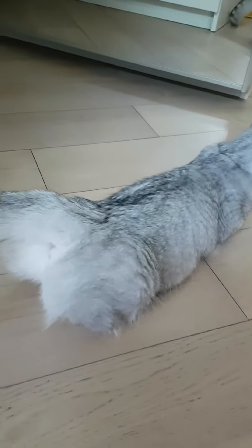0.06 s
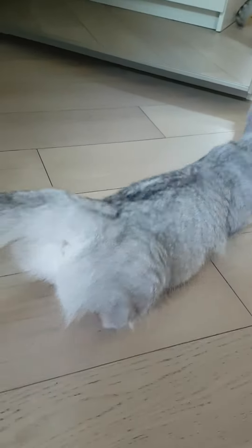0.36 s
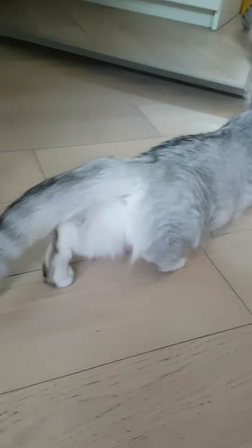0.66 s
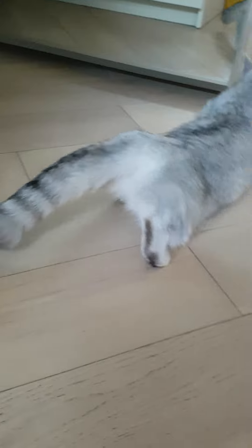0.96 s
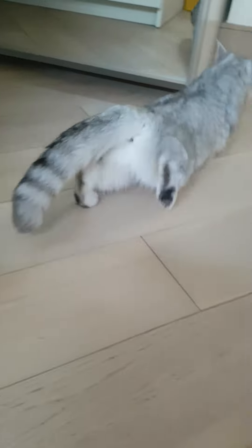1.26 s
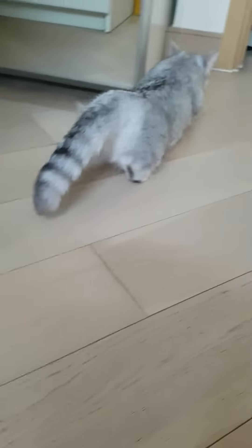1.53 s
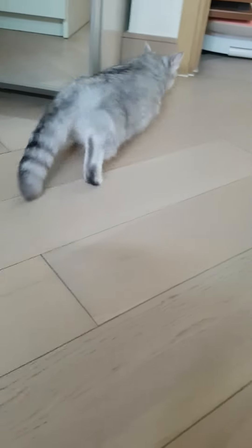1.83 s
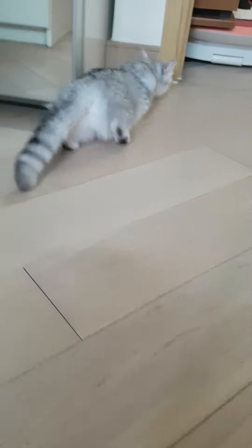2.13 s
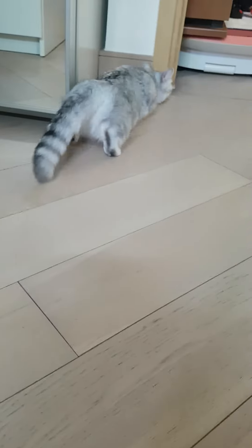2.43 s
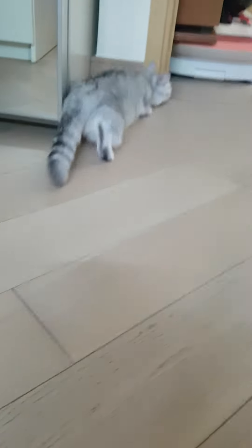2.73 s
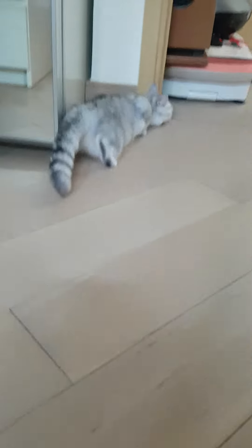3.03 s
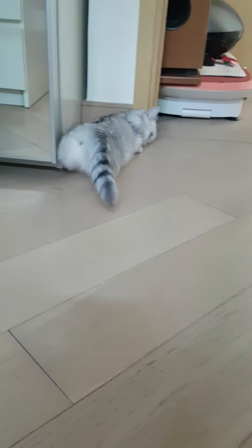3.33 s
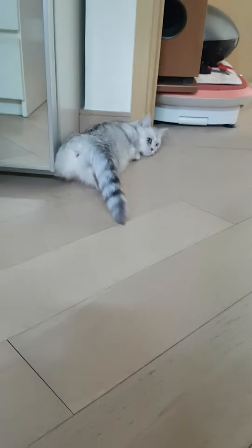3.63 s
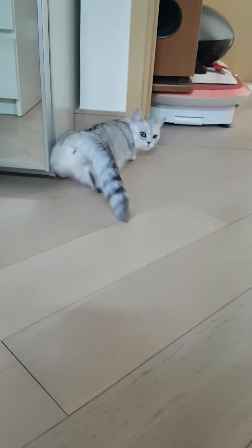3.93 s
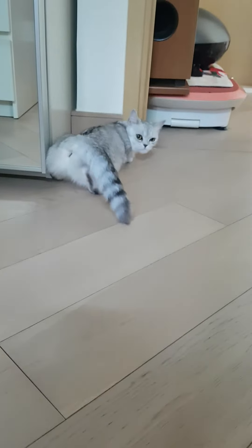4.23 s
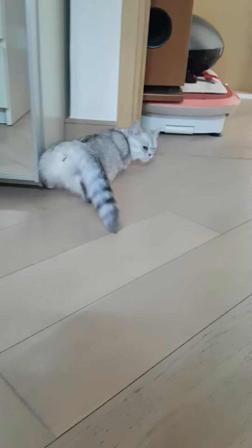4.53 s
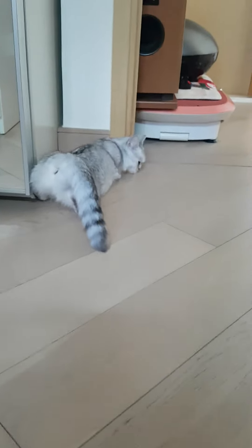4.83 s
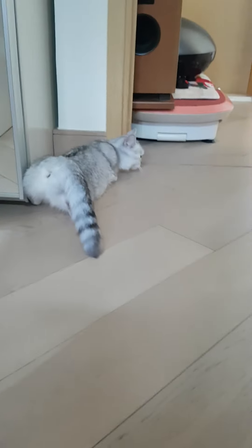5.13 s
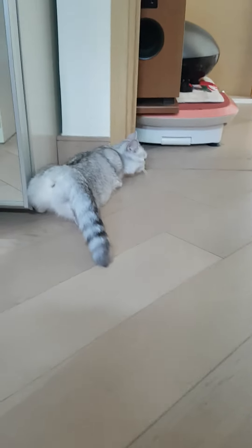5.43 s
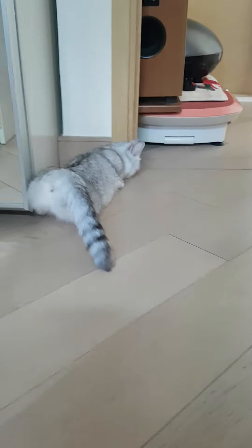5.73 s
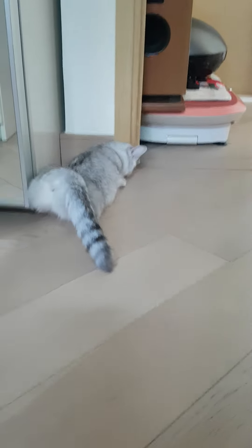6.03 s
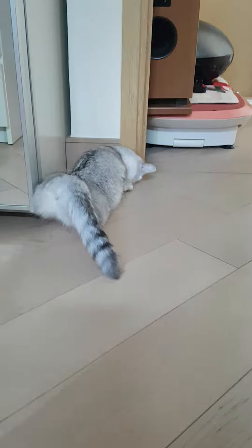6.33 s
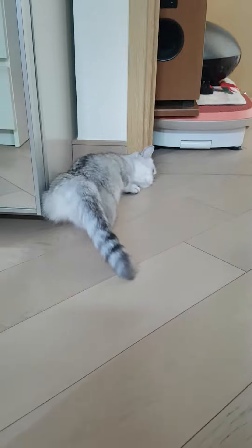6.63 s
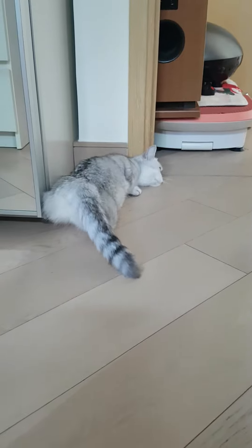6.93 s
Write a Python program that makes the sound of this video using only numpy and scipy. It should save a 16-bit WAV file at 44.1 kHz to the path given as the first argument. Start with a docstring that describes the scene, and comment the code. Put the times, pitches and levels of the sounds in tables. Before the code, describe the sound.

A cat gives four low, growling yowls indoors, with a few sharp clicks and faint scuffs over a ventilation hum.

```python
"""A yowling cat indoors

A cat gives four low yowls that rise and fall, the last two with its mouth opening wide. On the higher
notes its throat closes about 32 times a second, so a growl throbs through the voice. Paws and fur brush
the wooden floor, and fingers click on the phone that listens, sharpest in one double click.
Ventilation hums throughout; a far engine and a second low drone join in for a while."""
import sys
import numpy as np
from scipy import signal
from scipy.fft import rfft, irfft
from scipy.io import wavfile
from scipy.ndimage import uniform_filter1d

SR = 44100
rng = np.random.default_rng(int(sys.argv[2]) if len(sys.argv) > 2 else 0)


def store_pcm(level_fs):
    """Save levels as 16-bit WAV."""
    pcm = np.round(np.clip(level_fs, -1, 1) * 32767).astype(np.int16)
    wavfile.write(sys.argv[1], SR, np.atleast_2d(pcm).T)


N = 311972
T = np.arange(N) / SR  # time of each sample [s]
HZ = np.maximum(np.arange(N // 2 + 1) * SR / N, 1)  # frequencies the filters work on [Hz]

# how alike the phone's two microphones hear noise: (frequency [Hz], correlation [-1 to 1])
MIC_LIKENESS = [(60, 0.98), (130, 1), (290, 0.48), (640, 0.46), (1410, -0.24), (3100, 0.094),
                (6820, -0.063), (15000, -0.017)]
# rumble and hiss of moving air: (frequency [Hz], relative level [dB])
AIR_SPECTRUM = [(20, -22), (40, -12), (100, -6.5), (200, -11.5), (240, -8.5), (420, -12.5), (700, -12.5),
                (1150, -20), (1350, -19.5), (2300, -24), (3300, -33), (8000, -43.5), (10500, -42),
                (15000, -35)]
# resonances of the air duct and the room: (frequency [Hz], rough width [Hz], level [dB])
DUCT_RESONANCES = [(44, 20, -57), (55.6, 5.6, -58.5), (82.5, 7, -61.5), (131.1, 21.8, -56),
                   (163.5, 30.6, -56.5), (182.13, 8.6, -57.5), (540, 89, -68.5), (1136, 87, -72)]

# one list for each yowl, tracing its tune: (time [s], pitch [Hz])
YOWL_PITCHES = [
    [(.02, 334), (.09, 343.3), (.16, 364.6), (.33, 348.8), (.54, 383.1), (.58, 362), (.635, 342)],
    [(.922, 404.5), (.96, 396.6), (1.0, 409), (1.055, 411.6), (1.11, 377.6), (1.16, 371), (1.255, 318)],
    [(3.19, 315), (3.26, 334.5), (3.32, 376), (3.56, 383), (3.64, 405), (3.69, 434.7), (3.76, 443.7),
     (3.84, 396), (3.91, 360.5)],
    [(4.372, 418), (4.44, 434.6), (4.53, 424.5), (4.57, 397.3), (4.66, 397.5), (4.73, 386), (4.81, 356)],
]
# each yowl's voice at EASY_HZ: (relative level [dB], overtones against the lowest tone [dB],
# roughness [0-1], fade-in [s], time of one throat closure [s], vocal-fold cycles per closure [count])
YOWL_VOICES = [(-42.5, -3.5, .15, 0.062, .531, 12), (-40.5, -9, 0.25, 0.04, 1.035, 12.2),
               (-47.5, -0.85, 0.37, .02, 3.704, 13.4), (-47.5, -1.5, 0.23, 0.043, 4.503, 12.9)]
# how the cat's head moves: (time [s], jaw opening [0-1], lowest tone's left minus right [dB])
HEAD_MOVES = [(1.3, .04, 0), (3.3, 0.5, 3), (3.58, 1, 5.5), (3.7, 1, 0.5), (4.48, 0.91, -3.5),
              (4.6, .9, 7.5), (4.8, 0.85, 5)]
# throat and mouth resonances, jaw nearly shut: (frequency [Hz], width [Hz], relative level [dB])
SHUT_RESONANCES = [(727, 335, 16), (990, 115, 2.5), (1500, 210, -1), (2200, 280, -43), (4500, 3500, -46)]
# the same with the jaw wide open: (frequency [Hz], width [Hz], relative level [dB])
OPEN_RESONANCES = [(868.8, 282, 5.5), (1183, 120, -7.5), (1682.6, 270, -1), (2190, 540, -17),
                   (2570, 3300, -19.5), (4500, 3000, -48)]
# hoarse squeals in the first two yowls, and at 0.606 s a brief bright swell near the first yowl's third
# harmonic: (peak time [s], half-length [s], pitch [Hz], relative level [dB])
SQUEAL_EVENTS = [(0.256, .015, 845, -56), (0.565, 0.038, 875.5, -50.5), (0.606, 0.022, 1050, -48),
                 (1.012, 0.068, 931, -51), (1.16, .05, 1090, -50)]

# paws and fur brushing the floor:
# (peak time [s], half-length [s], level [dB], middle of the hiss [Hz], floor against the hiss [dB])
SCUFF_EVENTS = [(0.507, 0.0042, -62.5, 6000, -5), (.528, 0.014, -57, 4960, -1), (0.558, .05, -71, 4000, 9),
                (0.741, .033, -68.5, 2980, 9), (0.784, 0.02, -55.5, 3700, 1), (0.807, 0.014, -55, 2530, -2),
                (.978, 0.0066, -67, 5984, -3), (1.052, 0.15, -75.5, 4930, 13),
                (1.626, 0.061, -74, 4700, 11), (1.804, 0.052, -73, 3000, 14), (1.799, 0.0089, -57, 520, 6),
                (3.008, 0.018, -70, 3460, -2), (5.492, 0.0086, -69.5, 3080, 17.5),
                (6.437, 0.054, -75.5, 4012, 15), (6.533, 0.065, -70, 4530, 9)]
# the dull sound of the brushed floor: (frequency [Hz], relative level [dB])
FLOOR_SPECTRUM = [(80, -11), (280, -3), (900, -14), (2200, -18), (4000, -32.5), (16000, -59)]

# fingers clicking on the phone's case:
# (time [s], level [dB], extra thump [dB], extra snap [dB], left minus right [dB])
FINGER_CLICKS = [(0.549, -45, 9.5, -21, -18), (1.1816, -34.5, -20, -12.5, 0), (2.660, -39.5, 3.5, -10, 15),
                 (2.6628, -41, -16, -11, 15), (2.6652, -44, -21, -13, 18), (2.699, -28.5, 7.5, -7, 12),
                 (2.7067, -35, 8, 0.5, -6.5), (5.487, -50, -15, -6, 1)]
# the crack of a finger meeting the case: (frequency [Hz], relative level [dB])
CRACK_SPECTRUM = [(2000, 12), (4500, 3), (8000, -11), (13000, 4.5), (16000, -21)]
# tones the case rings with: (frequency [Hz], relative level [dB], rise time [ms])
CASE_TONES = [(69, -11, 19), (220, -5.5, 1.45), (600, 3, 0.78), (1135, -6.5, 1.36), (1870, -3.5, 0.43),
              (4030, -7, 0.33), (13500, -7, .15)]

# a far engine pulling away: (time [s], firing rate [Hz], level [dB])
FAR_ENGINE = [(3.1, 52.2, -73), (3.5, 57.47, -49.5), (4, 55.57, -52.5), (4.5, 55, -51), (5, 54.2, -51.5),
              (5.5, 53.5, -63)]
# a second low drone that climbs: (time [s], pitch [Hz], level [dB])
CLIMBING_DRONE = [(3.9, 70.4, -64), (4.35, 77.7, -58.5), (4.7, 82.5, -51), (5, 88.4, -55)]

# effort is the pitch in octaves above EASY_HZ: more of it is louder, brighter and cleaner
EASY_HZ, LOUD_DB_PER_OCT, BRIGHT_DB_PER_OCT, CLEAN_PER_OCT = 400, 23.5, 24.5, 0.76
ONSET_ROUGH, SETTLE_S, RELEASE_S = 0.36, 0.078, 0.005  # a yowl starts rough, settles and ends quickly
GROWL_DEPTH, GROWL_FROM_HZ, GROWL_KNEE_HZ = 0.6, 366, 11  # the growl sets in around this pitch
CHOKE, SLACKEN = 0.31, 0.1  # how strongly a throat closure dulls the voice and lowers its pitch


def gain(db):
    """Turn decibels into a number to multiply by."""
    return 10 ** (np.asarray(db) / 20)


def unit(x):
    """Scale a signal to an average (rms) size of 1."""
    return x / np.sqrt(np.mean(x ** 2))


def curves(rows):
    """Join each column of a table with straight lines in time."""
    times, *columns = np.transpose(rows)
    return [np.interp(T, times, column) for column in columns]


def spectrum(points):
    """Join points with straight lines on a scale of octaves."""
    hz, value = np.transpose(points)
    return np.interp(np.log(HZ), np.log(hz), value)


def resonance(hz, width):
    """A filter that passes hz fully and weakens the frequencies on either side."""
    return 1 / (1 + 1j * (HZ ** 2 - hz ** 2) / (HZ * width))


def filtered(x, response):
    """Multiply each frequency in a signal by the filter's response."""
    return irfft(rfft(x) * response, N)


def wobble(rate_hz):
    """A smooth random wobble of size 1, mostly slower than rate_hz."""
    return unit(filtered(rng.standard_normal(N), 1 / (1 + (HZ / rate_hz) ** 2) ** 2))


def pan(db):
    """Left and right gains that make the left louder by db."""
    return gain(np.array([[db], [-db]]) / 2)


def stereo_noise(response):
    """Noise from all around at two close microphones: alike in the bass, unrelated in the treble."""
    alike = np.clip(spectrum(MIC_LIKENESS), -1, 1)
    shared = filtered(rng.standard_normal(N), response * np.sqrt(1 + alike))
    opposite = filtered(rng.standard_normal(N), response * np.sqrt(1 - alike))
    return unit(np.array([shared + opposite, shared - opposite]))


def room(x, decay_s, echo_db):
    """The dense echoes of a small furnished room, which swallows the treble."""
    tail = stereo_noise(1) * gain(-60 * T / decay_s) * (T > .003)
    tail /= np.sqrt(np.sum(tail ** 2, axis=1, keepdims=True))
    return gain(echo_db) * filtered(x, rfft(tail) / np.sqrt(1 + (HZ / 4000) ** 2))


def ventilation():
    """Moving air rumbles and hisses steadily, and makes the duct and the room hum."""
    air = stereo_noise(gain(spectrum(AIR_SPECTRUM))) * gain(-56.5 + 0.34 * wobble(3.9))
    hum = sum(gain(db) * stereo_noise(resonance(hz, 0.98 * width) ** 2)
              for hz, width, db in DUCT_RESONANCES)
    return air * pan(0.2) + hum * pan(-3.5)


def voice_box():
    """Curves that steer the voice: each yowl's pitch sets its loudness, brightness, roughness and growl."""
    hz = np.full(N, float(EASY_HZ))
    loud, bright, rough, closure = np.zeros((4, N))
    stumble = .04 * wobble(25)  # keeps the growl slightly uneven
    for points, voice in zip(YOWL_PITCHES, YOWL_VOICES):
        db, overtone_db, roughness, attack_s, closure_s, cycles = voice
        age, remaining = T - points[0][0], points[-1][0] - T
        on = (age > 0) & (remaining > 0)
        pitch = uniform_filter1d(curves(points)[0], size=1300)[on]  # rounds off the corners
        effort = np.log2(pitch / EASY_HZ)
        fade = np.sqrt(np.clip(np.minimum(age[on] / attack_s, remaining[on] / RELEASE_S), 0, 1))
        hz[on] = pitch
        loud[on] = fade * gain(db + LOUD_DB_PER_OCT * effort)
        bright[on] = gain(overtone_db + BRIGHT_DB_PER_OCT * effort)
        rough[on] = roughness - CLEAN_PER_OCT * effort + ONSET_ROUGH * np.exp(-age[on] / SETTLE_S)
        # the throat closes every dozen or so fold cycles, so the growl slows as the pitch falls
        beats = np.cumsum(pitch) / SR / cycles
        beats -= np.interp(closure_s, T[on], beats)
        closure[on] = np.cos(np.pi * (beats + stumble[on])) ** 4
    growl = GROWL_DEPTH * (1 + np.tanh((hz - GROWL_FROM_HZ) / GROWL_KNEE_HZ)) / 2
    return hz, loud, bright, np.clip(rough, 0, 1), growl, closure


def throat(source, resonances):
    """The throat and mouth colour the voice with their resonances; the level is kept even."""
    response = sum(gain(db) * resonance(hz, width) * resonance(hz, 3 * width)
                   for hz, width, db in resonances)
    voice = filtered(source, response)
    return voice / np.sqrt(uniform_filter1d(voice ** 2, size=2205))


def cat():
    """Vocal folds buzz, the closing throat chops the buzz into a growl, and the jaw shapes the vowel."""
    hz, loud, bright, rough, growl, closure = voice_box()
    jaw, pan_db = curves(HEAD_MOVES)
    # each closure dips the whole voice and chokes the overtones even more
    throb = (1 - growl * closure) / (1 - growl * 0.63)
    choke = 1.08 * (1 - CHOKE * closure * growl / GROWL_DEPTH)
    # the folds slacken at each closure and jitter from cycle to cycle
    bend = -SLACKEN * growl * (closure - .27) + .055 * rough * wobble(260) + .004 * wobble(30)
    phase = 2 * np.pi * np.cumsum(hz * (1 + bend)) / SR
    loud = loud * throb * (1 + 0.52 * rough * wobble(170))
    # the highest overtones give way to air rushing through the folds once a cycle
    pulses = unit(sum(np.cos(k * phase) / (1 + (k / 6) ** 4) for k in range(1, 10)))
    rasp = rough * unit(rng.standard_normal(N) * (1 + np.cos(phase)))
    buzz = pulses + 2.4 * rasp
    overtones = (1 - jaw) * throat(buzz, SHUT_RESONANCES) + jaw * throat(buzz, OPEN_RESONANCES)
    lowest_tone = unit(np.cos(phase) + 6 * filtered(rasp, resonance(325, 150) ** 2))
    nose = loud * lowest_tone * gain(0.9)
    mouth = loud * bright * overtones * choke + throb * squeals()
    mouth_left = filtered(mouth, np.exp(-2j * np.pi * HZ * .00006))  # arrives 0.06 ms later
    direct = nose * gain(np.array([pan_db, -pan_db]) / 2) + np.array([mouth_left, mouth]) * pan(-2.8)
    echoes = room(nose, decay_s=.15, echo_db=-11.5) + room(mouth, decay_s=.13, echo_db=-7)
    return gain(-5) * direct + echoes


def squeals():
    """Brief, hoarse, wavering tones swell and fade within the first two yowls: squeals, and one short bright
    swell near the third harmonic."""
    wavering_time = np.cumsum(1 + 0.0568 * wobble(183)) / SR
    tones = np.zeros(N)
    for peak_s, half_s, hz, db in SQUEAL_EVENTS:
        swell = gain(db) * np.exp(-((T - peak_s) / half_s) ** 2)
        tones += swell * np.sin(2 * np.pi * hz * wavering_time)
    return tones * (1 + .5 * wobble(100))


def scuffs():
    """Short grainy swishes of fur and one soft paw thud, over the dull sound of the floor."""
    fur, floor_level = np.zeros((2, N)), np.zeros(N)
    t = (np.arange(SR // 2) - SR // 4) / SR  # half a second around the peak
    for peak_s, half_s, db, hz, floor_db in SCUFF_EVENTS:
        start = int((peak_s + t[0]) * SR)
        span = slice(start, start + len(t))
        swell = gain(db) * np.exp(-2 * (t / half_s) ** 2)
        band = signal.butter(1, [.6 * hz, 1.5 * hz], "band", fs=SR)
        fur[:, span] += swell * unit(signal.lfilter(*band, rng.standard_normal((2, len(t)))))
        floor_level[span] += swell * gain(floor_db)
    grain = gain(2.5 * wobble(360))
    floor = floor_level * stereo_noise(gain(spectrum(FLOOR_SPECTRUM)))
    return grain * pan(-5) * (fur + floor)


def finger_clicks():
    """Each touch makes a crack and rings the phone's case very briefly; the low tones swell later."""
    out = np.zeros((2, N))
    t = T[:SR // 10]
    crack = stereo_noise(gain(spectrum(CRACK_SPECTRUM)))
    for start_s, db, thump_db, snap_db, pan_db in FINGER_CLICKS:
        start = int(start_s * SR)
        span = slice(start, start + len(t))
        out[:, span] += gain(db + snap_db - 4.5) * crack[:, span] * np.exp(-t / 0.0013)
        for hz, tone_db, rise_ms in CASE_TONES:
            age = t / (rise_ms / 1000)
            swell = (age * np.exp(1 - age)) ** 2
            extra_db = thump_db * (hz < 400) + snap_db * (hz > 3000)
            bends_case = hz > 100  # bending moves the two microphones out of step
            ring = np.sin(2 * np.pi * hz * t + bends_case * np.array([[0], [1.3]]))
            out[:, span] += gain(db + tone_db + extra_db) * swell * ring * pan(pan_db * bends_case)
    return out + room(out.mean(axis=0), decay_s=.09, echo_db=-9.5)


def drone(rows):
    """A low wavering tone comes through the walls, from the table's first time to its last."""
    hz, db = curves(rows)
    phase = 2 * np.pi * np.cumsum(hz * (1 + 0.024 * wobble(6.9))) / SR
    inside_s = np.minimum(T - rows[0][0], rows[-1][0] - T)
    fade = np.clip(inside_s / .1 + .5, 0, 1)  # 0.1 s at each end
    return unit(np.sin(phase)) * gain(db + 2 * wobble(4.3)) * fade * pan(-1.9)


def scene():
    """Add up everything that reaches the two microphones."""
    return cat() + finger_clicks() + scuffs() + ventilation() + drone(FAR_ENGINE) + drone(CLIMBING_DRONE)


def record(dry):
    """The phone cuts the rumble below 24 Hz and the treble above 15750 Hz."""
    dry = signal.sosfilt(signal.butter(2, 24, "high", fs=SR, output="sos"), dry)
    return signal.sosfilt(signal.ellip(10, .2, 60, 15750, fs=SR, output="sos"), dry)


dry = scene()
out = record(dry)
store_pcm(out)
```